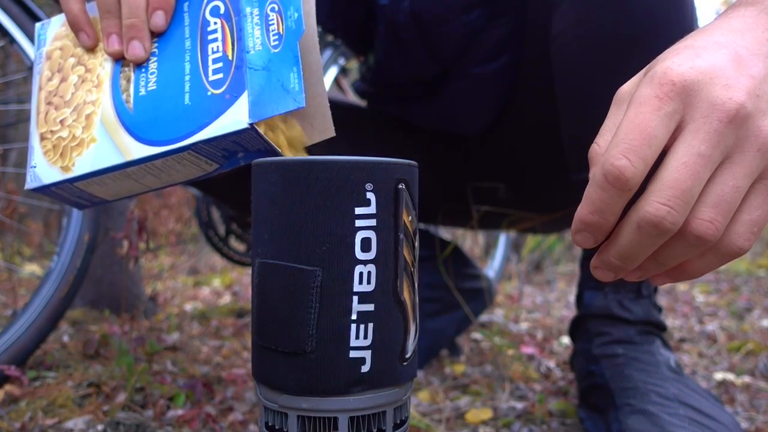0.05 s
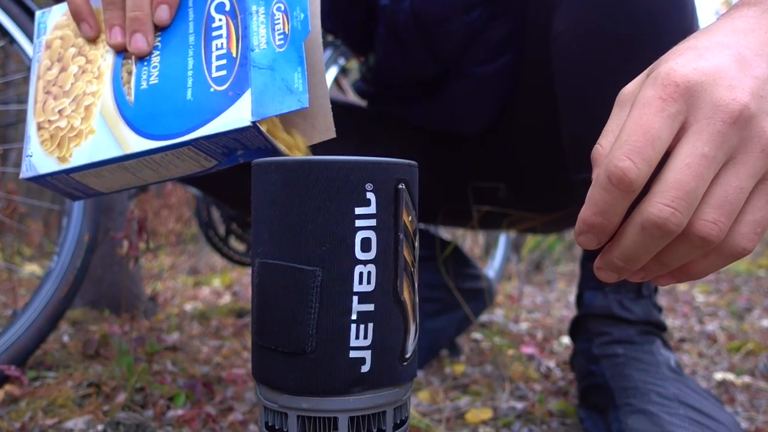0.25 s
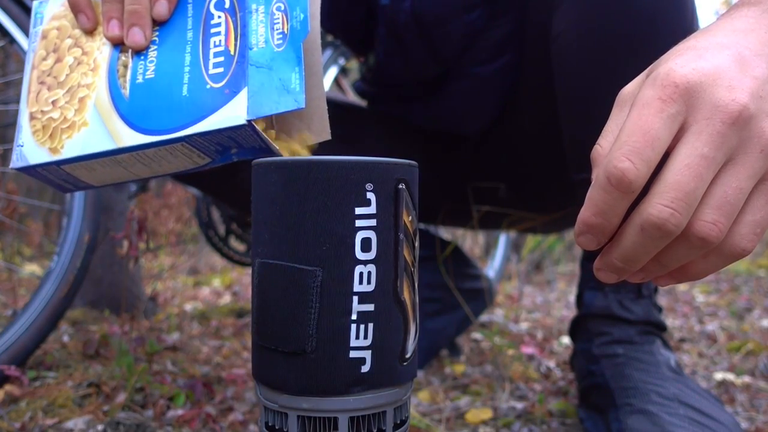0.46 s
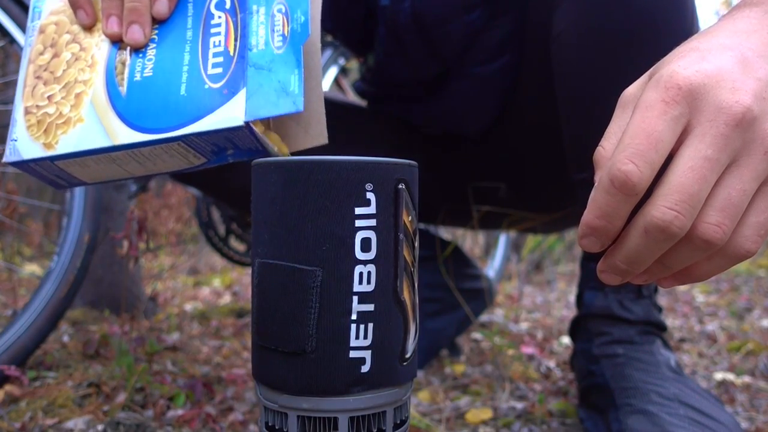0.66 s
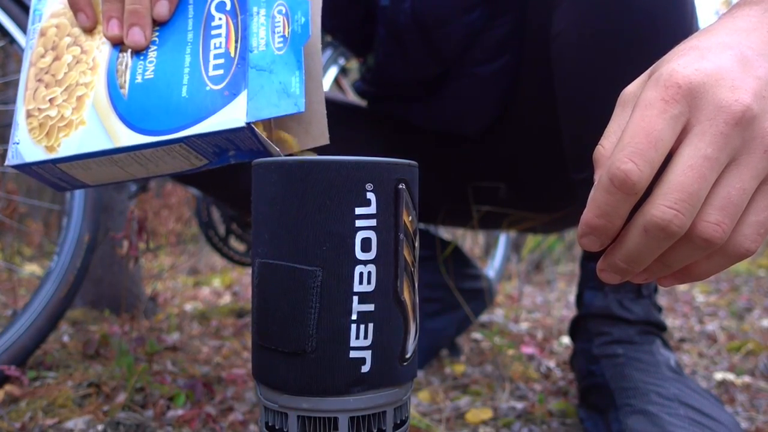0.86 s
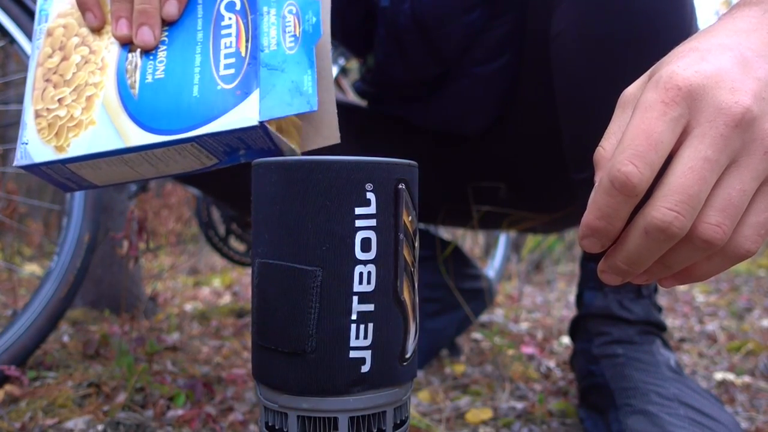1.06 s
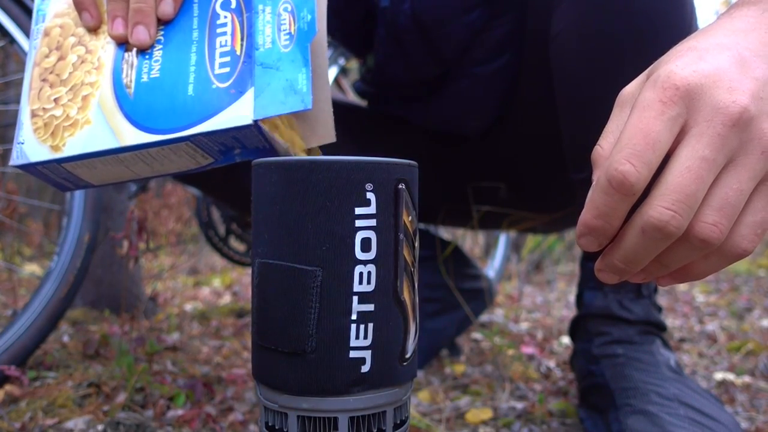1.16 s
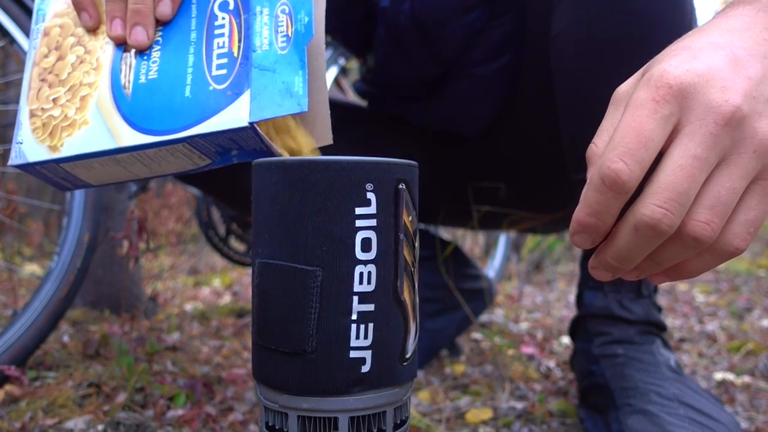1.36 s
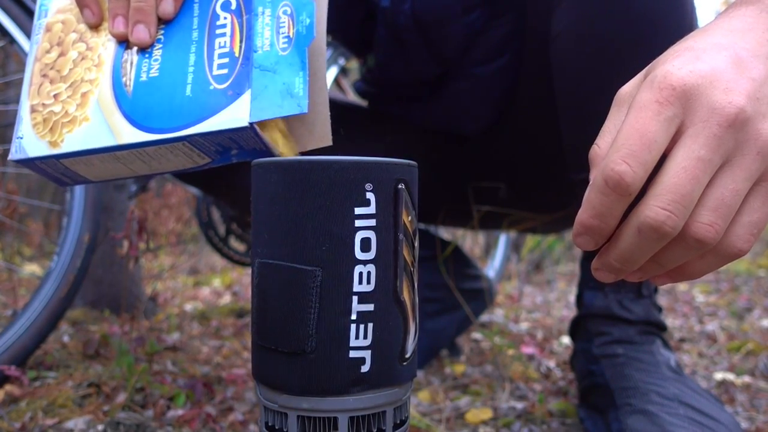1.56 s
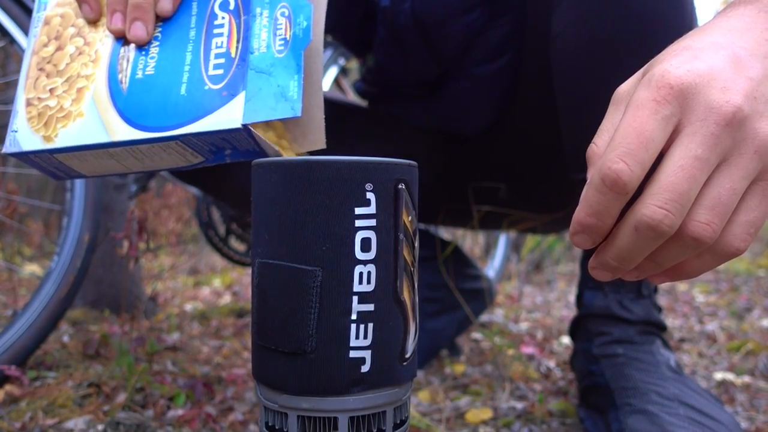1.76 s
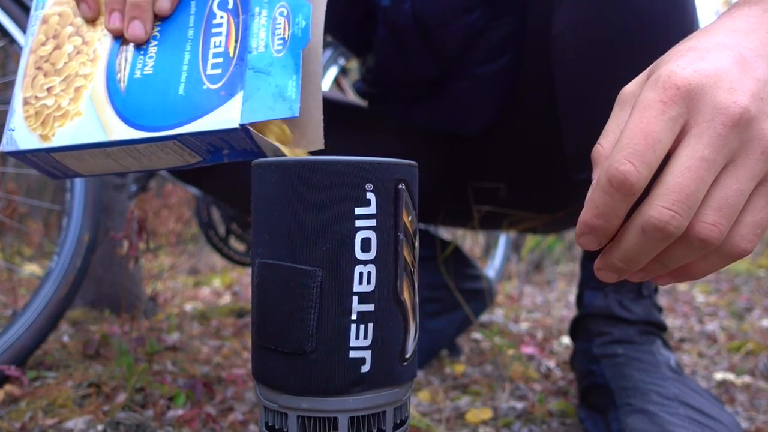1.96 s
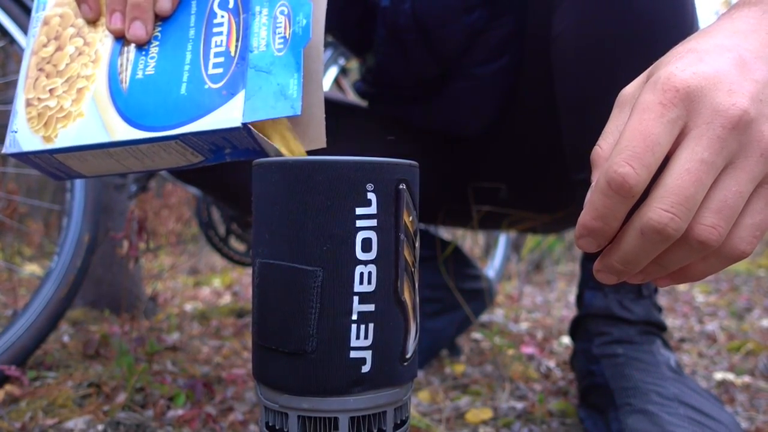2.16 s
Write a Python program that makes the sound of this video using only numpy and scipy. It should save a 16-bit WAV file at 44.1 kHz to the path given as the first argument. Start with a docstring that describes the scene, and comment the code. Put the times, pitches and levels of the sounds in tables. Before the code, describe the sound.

Dry macaroni pours from a cardboard box into a metal cup with a dense, hollow rattle. The stream briefly thins to separate hard clicks, then runs thick again with small clinks. Close up, in quiet outdoor air.

```python
"""Dry macaroni slides from a cardboard box into a sleeved metal cup, outdoors, close, a little left.
Dense short contacts ring in three registers: hollow knock of box and cup, hard clatter, the pieces' ticks.
The stream thins to separate hard landings around 0.5-1 s, then runs thick again.
Clipped pieces ping, square strikes clink on the cup's tones; faint air lies underneath."""
import sys
import numpy as np
from scipy import signal
from scipy.fft import rfft, irfft, next_fast_len
from scipy.io import wavfile
from scipy.ndimage import uniform_filter1d

SR = 44100
rng = np.random.default_rng(int(sys.argv[2]) if len(sys.argv) > 2 else 0)


def wrap_up_sound(samples):
    """Save the sound to the file named by the first command line argument, as 16-bit audio."""
    columns = np.atleast_2d(samples).T
    # keep every value between -1 and 1, then stretch to whole-number steps
    tamed = np.clip(columns, -1, 1)
    steps = np.round(tamed * 32767).astype(np.int16)
    wavfile.write(sys.argv[1], SR, steps)


N = 97637

# Register spectra: freq_hz, gain_db
HOLLOW_COLOUR = [(30, -44), (100, -36), (200, -28.5), (290, -21), (390, -21), (500, -15.5), (600, -14),
                 (700, -10), (800, -4.5), (950, 0), (1150, -7), (1400, -5.5), (1900, -13.5), (4000, -39)]
CLATTER_COLOUR = [(40, -56), (400, -27), (1100, -6), (1450, -7.5), (1750, -1.5), (2000, -1), (2230, 2),
                  (2330, 0), (2440, 2), (2570, -3), (2780, 1), (3200, -6), (3700, -7), (3950, -13),
                  (4200, -8), (4700, -23), (6500, -16.5), (14000, -69.5)]
TICK_COLOUR = [(100, -70), (1500, -37), (4700, -4), (5400, -7.5), (6400, -3.5), (7300, -0.5), (8300, -1.5),
               (10300, 0), (12000, -4.5), (13300, -10), (14400, -22), (15700, -11)]
# Register resonances: low_hz, high_hz, t60_s, spread_db, stereo_scatter_rad, stream_trim_db, hit_trim_db
HOLLOW_MODES = (184, 1419, 0.015, 3.2, 0.075, 0.23, 1.1)
CLATTER_MODES = (1320, 4886, 0.0093, 1.06, 0.28, 0.16, 0.66)
TICK_MODES = (5000, 16000, .011, 2.7, 0.7, 0.37, 0.53)
REGISTERS = [(HOLLOW_COLOUR, HOLLOW_MODES), (CLATTER_COLOUR, CLATTER_MODES), (TICK_COLOUR, TICK_MODES)]


def from_db(db):
    """Decibels to gain."""
    return 10 ** (np.asarray(db) / 20)


def per_sample(rows):
    """Each column of a time curve, interpolated linearly."""
    time_s, *columns = np.transpose(rows)
    return [np.interp(np.arange(N) / SR, time_s, column) for column in columns]


def at_hz(points, hz):
    """Table lookup on a log-frequency axis."""
    freq_hz, value = np.transpose(points)
    return np.interp(np.log(hz + 1), np.log(freq_hz + 1), value)


def response(colour, size=4096):
    """Minimum-phase impulse response of a spectrum."""
    gain_db = at_hz(colour, np.arange(size // 2 + 1) * SR / size)
    cepstrum = irfft(gain_db * np.log(10) / 20)
    cepstrum[1:size // 2] *= 2
    cepstrum[size // 2 + 1:] = 0
    return irfft(np.exp(rfft(cepstrum)))[None, :size // 2]


def convolve(x, impulse):
    """Convolution cut to the input length."""
    return signal.fftconvolve(x, impulse, axes=-1)[:, :x.shape[1]]


def mix_in(out, start_s, sound):
    """Add a sound in place."""
    i = int(np.clip(start_s * SR, 0, N - 1))
    out[:, i:i + sound.shape[1]] += sound[:, :N - i]


def outdoor_air(level_db=-102):
    """Faint steady noise floor."""
    colour = [(20, -1), (60, -14), (200, 0), (1000, -3), (16000, -40.5)]  # freq_hz, gain_db
    noise = convolve(rng.standard_normal((2, N)), response(colour))
    return from_db(level_db) * noise / np.sqrt(np.mean(noise[0] ** 2))


def shade_right(x):
    """The right microphone is shaded, most in the treble, and shifted in phase."""
    # Right against left: freq_hz, loss_db
    loss = [(60, 3.9), (110, 0.9), (200, 1), (380, 0.5), (700, 2.7), (1290, 4.2), (2380, 7), (4400, 7.3),
            (8120, 12.3), (15000, 10.3)]
    # Right against left: freq_hz, lag_rad (negative leads)
    lag = [(0, -0.26), (600, -1.17), (1210, -1.38), (3700, -0.89), (4900, -2.08), (6400, -.5),
           (10200, -0.62), (15000, -1.1)]
    size = next_fast_len(N + SR // 10)
    hz = np.arange(size // 2 + 1) * SR / size
    shade = from_db(-at_hz(loss, hz)) * np.exp(-1j * np.interp(hz, *np.transpose(lag)))
    return np.array([x[0], irfft(rfft(x[1], size) * shade, size)[:N]])


def with_cup_tail(x, band_hz, scatter, t60_s=0.042, gain_db=-7, width=0.36):
    """Add diffuse reflections in box and cup, never alike as the pieces keep moving."""
    decay = from_db(-60 / (t60_s * SR)) ** 2
    power = signal.lfilter([1 - decay], [1, -decay], x[0] ** 2 + 1e-18)
    mid, side = rng.standard_normal((2, x.shape[1]))
    spray = mid + 2 * width * scatter * side * np.array([[1], [-1]])
    return x + from_db(gain_db) * np.sqrt(power * SR / 2 / band_hz) * spray


def mode_clusters(strikes, t60_s, rise_s, spread, size=4096, count=5):
    """Each strike rings a tight cluster of modes around its pitch."""
    out, t = np.zeros((2, N)), np.arange(size) / SR
    envelope = from_db(-60 * t / t60_s) * (1 - np.exp(-t / rise_s))
    for start_s, pitch_hz, peak_db in strikes:
        modes_hz = pitch_hz * (1 + spread * rng.uniform(-1.15, 1, (count, 1)))
        tone = envelope * np.sin(2 * np.pi * (modes_hz * t + rng.random((count, 1)))).sum(axis=0)
        mix_in(out, start_s, from_db(peak_db) * tone[None] / np.abs(tone).max())
    return out


def piece_pings():
    """A clipped piece rings freely."""
    # Pings: start_s, pitch_hz, peak_db
    strikes = [(0.5612, 10000, -19.5), (0.575, 10100, -31), (0.6014, 10140, -32), (0.7195, 10400, -33),
               (0.7875, 10000, -26.5), (.876, 10100, -35), (1.792, 12100, -27.5), (1.925, 10110, -24),
               (1.949, 10900, -28), (2.025, 9304, -31)]
    return mode_clusters(strikes, t60_s=0.0075, rise_s=0.00098, spread=0.034)


def cup_clinks():
    """A piece strikes the cup squarely and sounds one of its tones."""
    # Clinks: start_s, pitch_hz, peak_db
    strikes = [(.078, 883, -31.5), (.094, 2140, -28), (.104, 1970, -29), (.106, 876, -27.5),
               (1.119, 900, -28.5), (1.18, 2067, -26.5), (1.187, 2240, -27), (1.282, 3487, -27),
               (1.303, 920, -33), (1.339, 928.5, -28.5), (1.36, 835, -29.5), (1.487, 2230, -28),
               (1.565, 2239, -22.5), (1.684, 1037, -28.5), (1.754, 2347, -23), (1.8935, 2230, -22.5),
               (1.977, 2858, -27), (2.054, 2410, -38), (2.076, 2368, -29), (2.187, 2423, -29)]
    return mode_clusters(strikes, t60_s=0.042, rise_s=0.0013, spread=0.03)


def hard_landings(crunch_s=0.00035, ring_db=-2, mean_s=0.004, size=1536, count=8):
    """A piece lands in three quick touches; each crunches on its ridges and rings every register."""
    # Landings: blow_s, touch_gap_s, hollow_db, clatter_db, tick_db (energy spread over mean_s, before trim)
    landings = [(.0995, 0.0012, -38, -34, -40), (.11, 0.0012, -34.5, -26.5, -44.5),
                (0.2016, 0.0017, -51, -30.5, -38), (.3061, 0.00096, -43, -32.5, -34.5),
                (0.3488, 0.00069, -48, -30, -34), (0.3545, 0.00055, -39, -28.5, -37),
                (0.3734, .001, -53, -32, -43), (0.3867, .0015, -44, -30, -33), (.4163, .001, -37, -29, -50),
                (0.4357, .001, -56, -30.5, -49), (0.4467, 0.0012, -51, -29.5, -47),
                (0.4787, .0016, -48, -27, -35.5), (0.49, 0.0021, -51, -29.5, -50),
                (0.495, .0011, -30.5, -33, -48.5), (.5131, 0.0012, -38, -31.5, -45),
                (0.517, .0012, -38, -37, -37), (.5354, 0.0018, -37, -40, -51),
                (0.5424, 0.0011, -48, -35.5, -44), (.578, 0.00051, -45, -33, -36),
                (0.585, .0015, -50, -35, -59), (.618, 0.0012, -51, -33, -40),
                (0.6314, .0006, -52, -34.5, -53), (0.6404, 0.00075, -54, -38, -45),
                (.663, 0.0013, -35.5, -33.5, -39), (0.682, 0.0012, -40, -53, -45),
                (0.6966, 0.001, -43, -28.5, -39), (0.705, 0.0009, -45, -37, -45),
                (0.7212, 0.0014, -42.5, -42, -41), (.7343, 0.00058, -40, -31, -37.5),
                (.7364, 0.00065, -32.5, -30, -42), (0.757, 0.00072, -46, -38, -48),
                (.764, 0.00082, -33, -31.5, -56), (0.774, 0.00038, -34, -30.5, -38),
                (0.7928, 0.00093, -35, -32, -39), (0.8088, .0004, -49, -38, -40),
                (0.817, 0.00064, -38, -28.5, -34), (0.8331, 0.00098, -46, -37, -42),
                (.843, 0.0011, -33, -29, -52), (.848, 0.0014, -31.5, -30, -39),
                (0.8539, .0009, -34.5, -27, -31), (0.8914, 0.00053, -46, -32.5, -39),
                (0.9105, 0.0009, -42, -30, -47), (0.9211, .001, -25.5, -33.5, -42),
                (0.9457, .001, -39, -34, -39), (0.9634, 0.00074, -26, -34, -46),
                (0.9846, 0.0011, -40, -29.5, -35), (0.9914, 0.00074, -37, -35, -40),
                (1.0145, 0.00091, -38, -43, -52), (1.03, 0.00084, -32.5, -35, -47),
                (1.047, 0.0004, -51, -32, -48), (1.061, 0.00057, -50, -31, -44),
                (1.1539, 0.00075, -34, -27.5, -37), (1.2588, 0.00092, -33, -40, -44),
                (1.284, .001, -32.5, -31, -38), (1.4925, .0016, -33, -37, -36),
                (1.525, 0.00037, -41, -43, -39), (1.5706, 0.0009, -46, -36, -37),
                (1.6636, 0.00071, -44, -29.5, -41), (1.7188, 0.00091, -44, -31, -38)]
    touch_db = (-6, 4.5, -4)  # graze, blow, rebound
    blows_s, gaps_s, *register_db = np.transpose(landings)
    low_cut = signal.butter(2, 208, "high", fs=SR, output="sos")  # the landings carry little below about 200 Hz
    out, t = np.zeros((2, N)), np.arange(size) / SR
    for (colour, modes), levels_db in zip(REGISTERS, register_db):
        low_hz, high_hz, t60_s, _, scatter, _, trim_db = modes
        body, band_hz = response(colour), high_hz - low_hz
        for blow_s, gap_s, level_db in zip(blows_s, gaps_s, levels_db):
            touches = np.zeros((2, size))
            touches[:, (np.arange(3) * gap_s * SR).astype(int)] = from_db(touch_db)
            crunch = rng.standard_normal(size) * np.exp(-t / crunch_s)
            clicks = convolve(touches, (crunch / np.linalg.norm(crunch) + (t == 0))[None])
            modes_hz = low_hz + band_hz * (np.arange(count) + rng.random(count)) / count
            ring = rng.standard_normal(count) @ np.sin(2 * np.pi * modes_hz[:, None] * t)
            ring *= from_db(-60 * t / t60_s)
            ring *= from_db(ring_db) * np.sqrt(2 * band_hz / SR / np.sum(ring ** 2))
            knock = with_cup_tail(clicks, SR / 2, scatter) + convolve(clicks, ring[None])
            knock = signal.sosfilt(low_cut, convolve(knock, body))
            knock *= np.sqrt(mean_s * SR / np.sum(knock[0] ** 2))
            mix_in(out, blow_s - gap_s, knock * from_db(level_db + trim_db))
    return out


def contact_ringing(times_s, sizes, modes, per_contact=4, mode_count=40):
    """Each contact rings a few random modes, slightly different left and right."""
    low_hz, high_hz, t60_s, spread_db, scatter = modes[:5]
    shape = (len(times_s), per_contact)
    struck_mode = (rng.random(shape) * mode_count).astype(int)
    strength, phase, lean = rng.standard_normal((3, *shape))
    left = sizes[:, None] * from_db(spread_db * np.clip(strength, -2, 2)) * rng.choice([-1, 1], shape)
    right = left * np.exp(scatter * (1j * phase + (lean - scatter / 2) / 2))
    onsets = np.clip((times_s * SR).astype(int), 0, N - 1)[:, None] + np.zeros(per_contact, int)
    out = np.zeros((2, N))
    for k, hz in enumerate(np.linspace(low_hz, high_hz, mode_count)):
        clicks, struck = np.full((2, N), 1e-18, complex), struck_mode == k
        np.add.at(clicks[0], onsets[struck], left[struck])
        np.add.at(clicks[1], onsets[struck], right[struck])
        pole = from_db(-60 / (t60_s * SR)) * np.exp(2j * np.pi * hz / SR)
        out += signal.lfilter([1], [1, -pole], clicks).imag
    return out


def macaroni_stream(count=8000, size_spread_db=2.5, window=1764):
    """One train of random contacts rattles all registers; levelled over 40 ms, grainy within."""
    # Flow: time_s, contacts_per_s
    flow = [(0, 2600), (.3, 1890), (.55, 1000), (.9, 1122), (1.15, 2300), (2.2, 2594)]
    # Rattle levels before trim: time_s, hollow_db, clatter_db, tick_db
    levels = [(0, -34, -28.5, -36), (0.11, -39, -30, -36), (0.18, -38.5, -34, -39.5),
              (0.24, -39.5, -32, -38), (0.29, -40, -36, -43.5), (0.36, -37, -31.5, -39),
              (0.45, -42, -36.5, -45), (0.56, -44, -39, -52), (0.66, -44.5, -43, -51),
              (0.8, -43.5, -38.5, -46.5), (0.88, -42, -37.5, -48.5), (0.98, -42, -36.5, -48.5),
              (1.08, -37, -34, -42), (1.17, -36.5, -29.5, -39.5), (1.3, -35.5, -31, -38),
              (1.41, -37, -30.5, -41), (1.49, -35.5, -30.5, -37), (1.61, -37, -31, -40.5),
              (1.665, -40, -34.5, -44.5), (1.73, -37.5, -29.5, -39.5), (1.83, -37.5, -29.5, -40),
              (1.97, -35.5, -28, -38), (2.21, -35.5, -29, -39)]
    contacts_per_s, = per_sample(flow)
    arrivals = np.cumsum(rng.exponential(1, count))
    times_s = np.interp(arrivals, np.cumsum(contacts_per_s) / SR, np.arange(N) / SR)
    sizes = from_db(size_spread_db * np.clip(rng.standard_normal(count), -2, 2))
    sizes *= times_s < (N - 1) / SR
    out = np.zeros((2, N))
    for (colour, modes), level_db in zip(REGISTERS, per_sample(levels)):
        low_hz, high_hz, _, _, scatter, trim_db, _ = modes
        ringing = contact_ringing(times_s, sizes, modes)
        rattle = convolve(with_cup_tail(ringing, high_hz - low_hz, scatter), response(colour))
        power = uniform_filter1d(uniform_filter1d(rattle[0] ** 2, window), window // 2)
        out += rattle / np.sqrt(np.abs(power) + 1e-12) * from_db(level_db + trim_db)
    return out


def scene():
    """The pour, left of centre, over outdoor air."""
    pour = piece_pings() + cup_clinks() + hard_landings() + macaroni_stream()
    return outdoor_air() + shade_right(pour)


def record(dry):
    """Steep low-pass."""
    cutoff_hz = 15800
    return signal.sosfilt(signal.ellip(12, .2, 80, cutoff_hz, fs=SR, output="sos"), dry)


dry = scene()
out = record(dry)
wrap_up_sound(out)
```